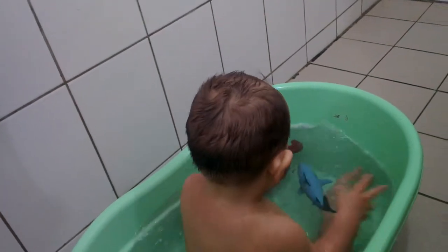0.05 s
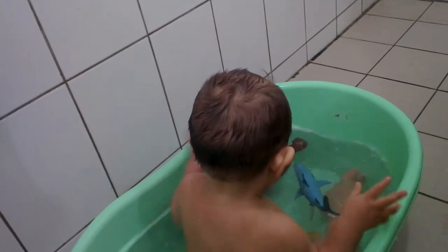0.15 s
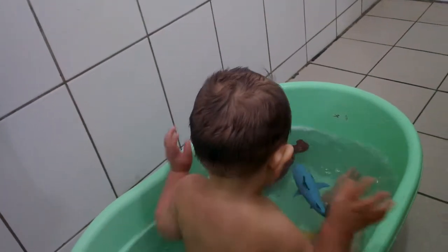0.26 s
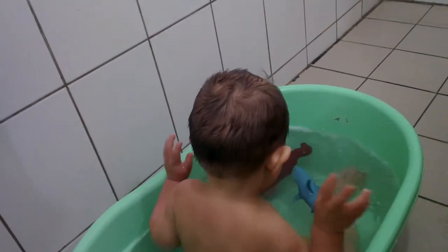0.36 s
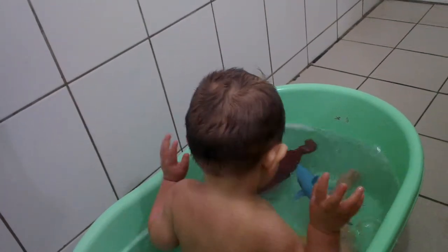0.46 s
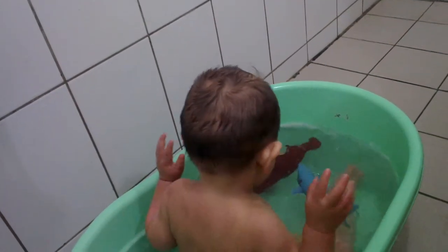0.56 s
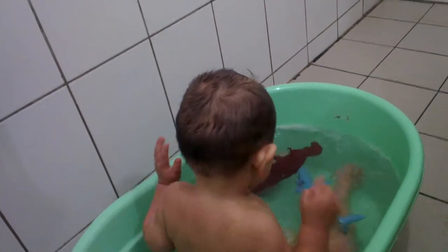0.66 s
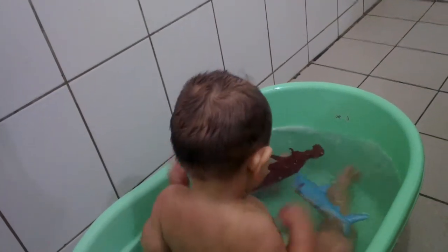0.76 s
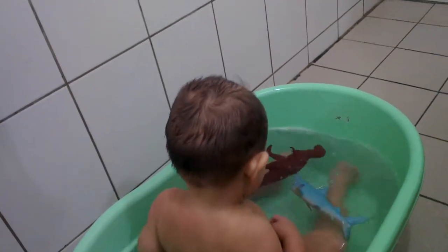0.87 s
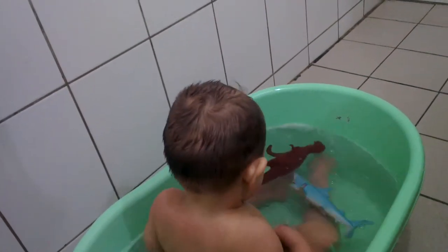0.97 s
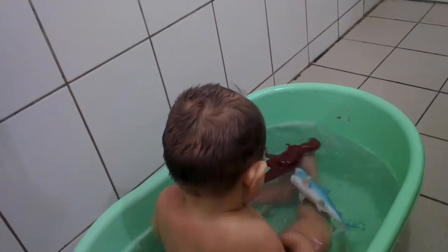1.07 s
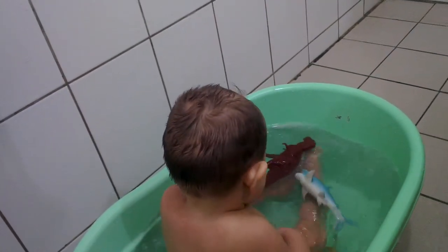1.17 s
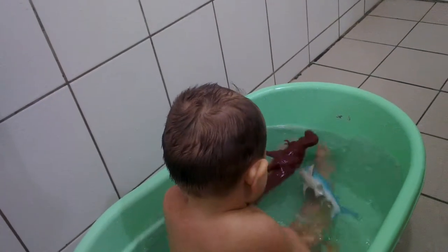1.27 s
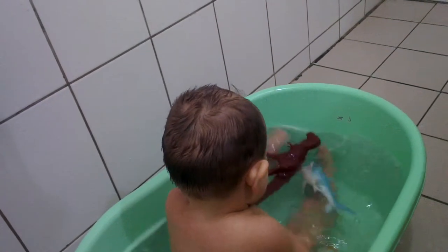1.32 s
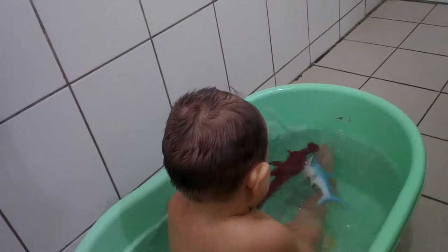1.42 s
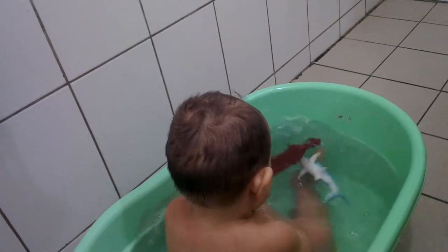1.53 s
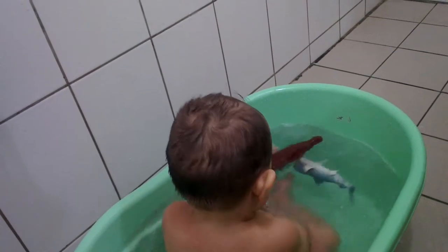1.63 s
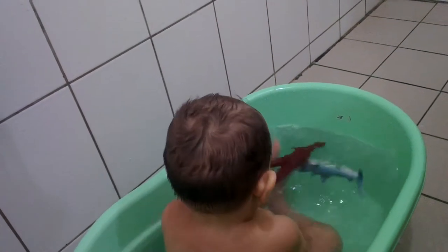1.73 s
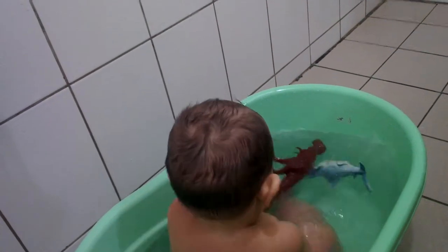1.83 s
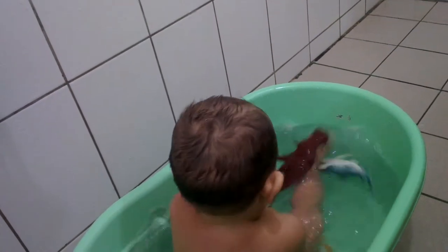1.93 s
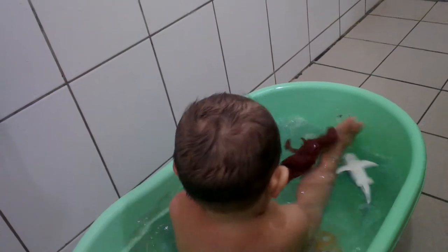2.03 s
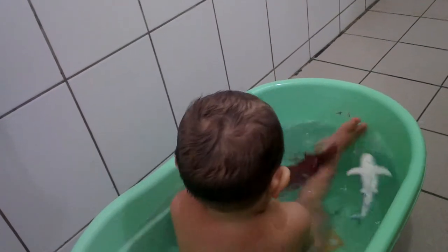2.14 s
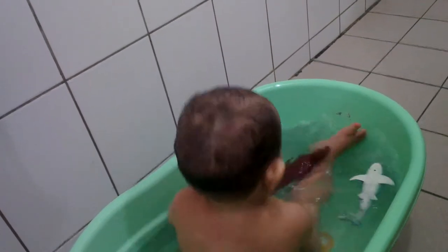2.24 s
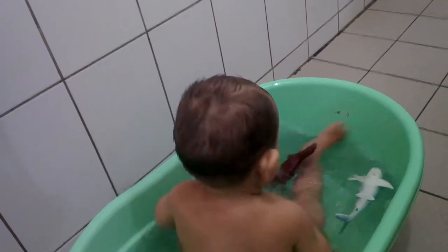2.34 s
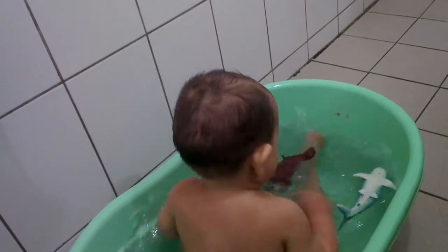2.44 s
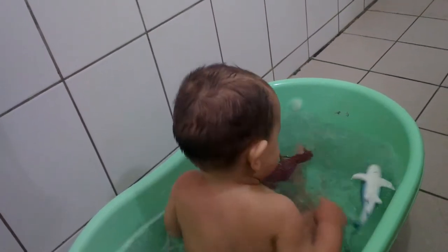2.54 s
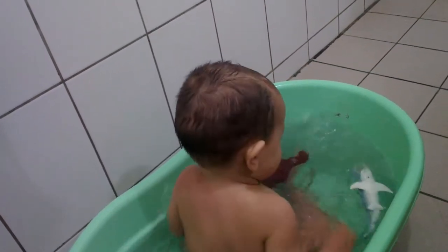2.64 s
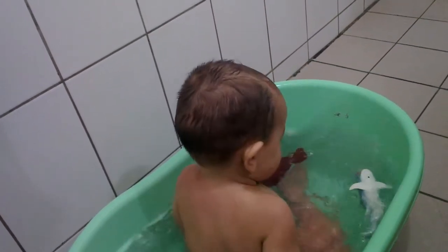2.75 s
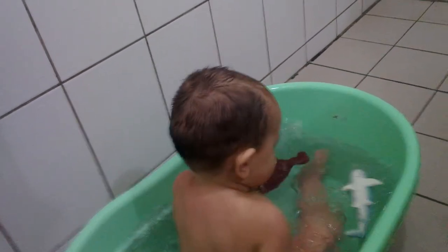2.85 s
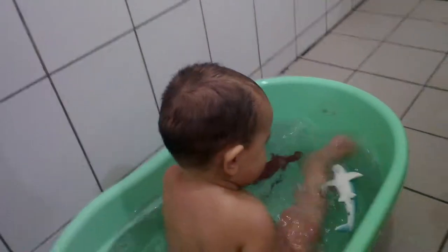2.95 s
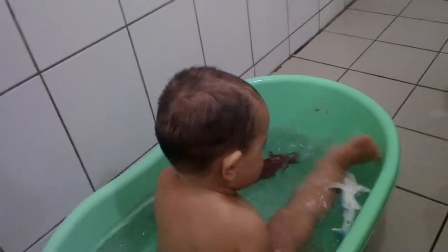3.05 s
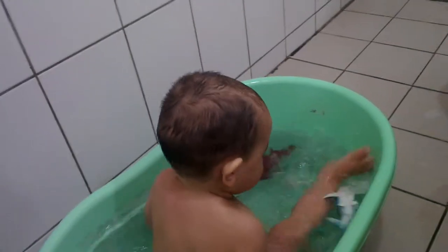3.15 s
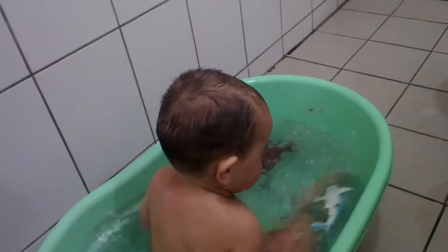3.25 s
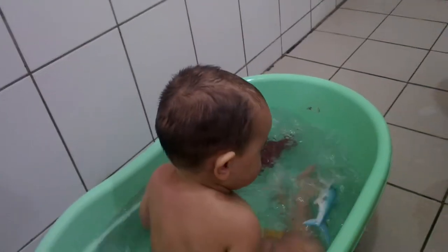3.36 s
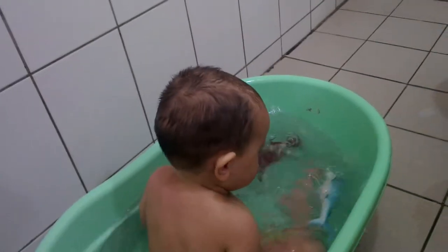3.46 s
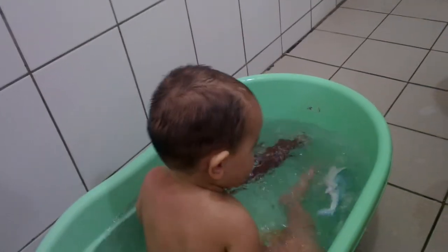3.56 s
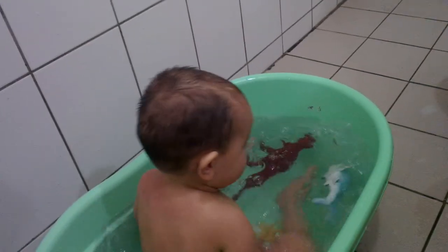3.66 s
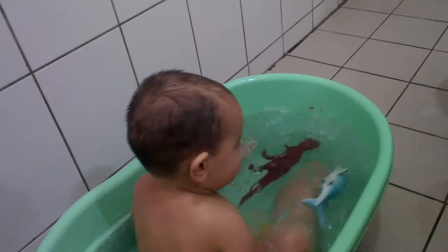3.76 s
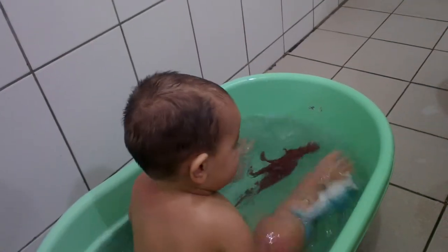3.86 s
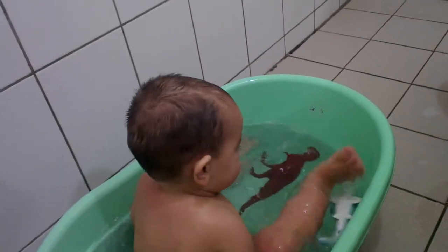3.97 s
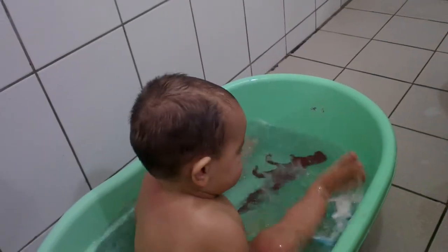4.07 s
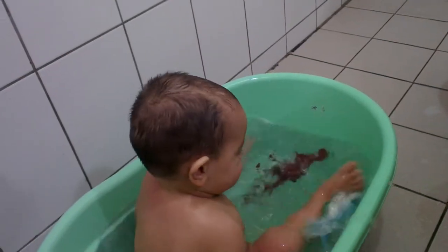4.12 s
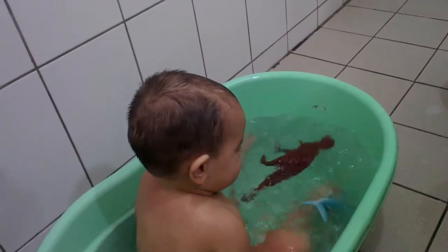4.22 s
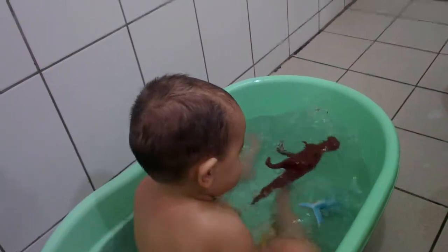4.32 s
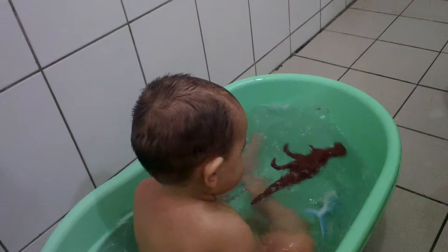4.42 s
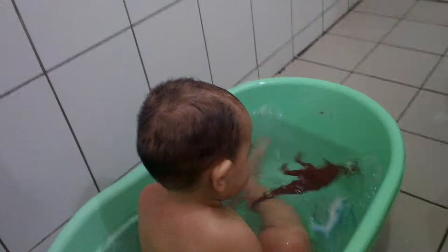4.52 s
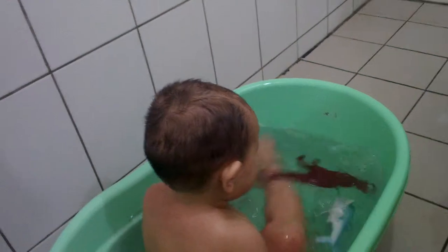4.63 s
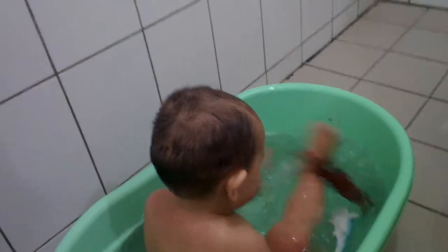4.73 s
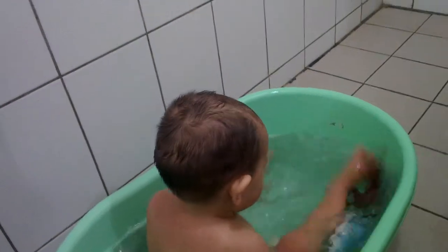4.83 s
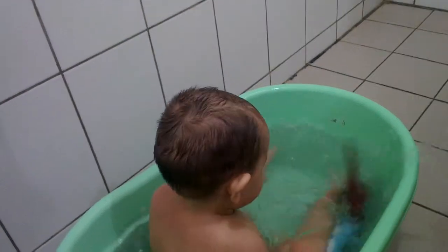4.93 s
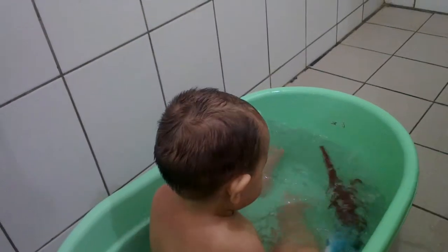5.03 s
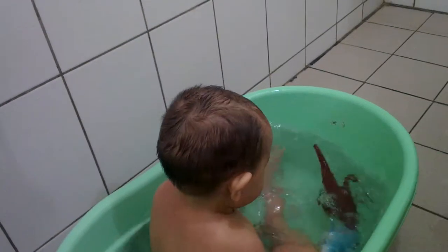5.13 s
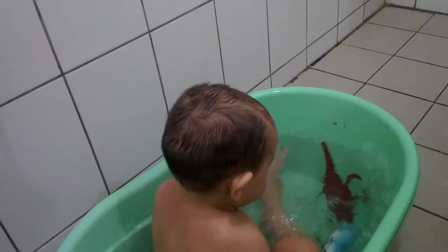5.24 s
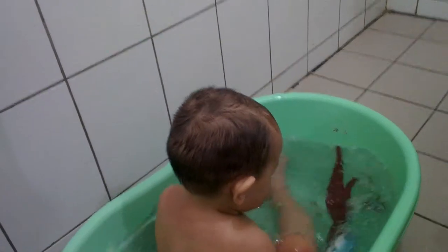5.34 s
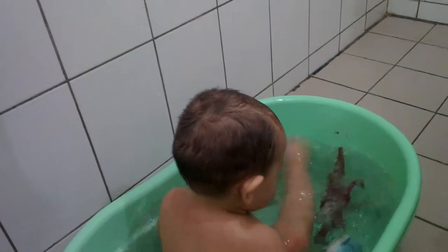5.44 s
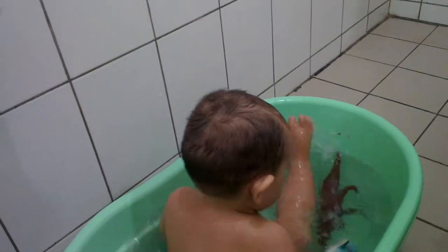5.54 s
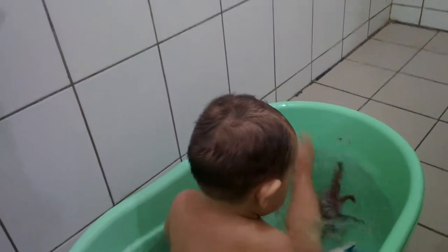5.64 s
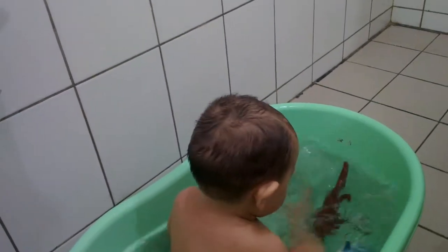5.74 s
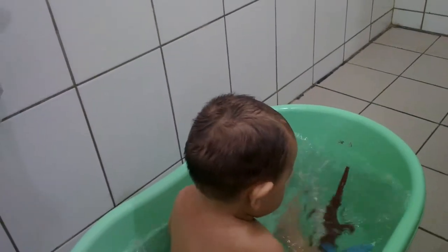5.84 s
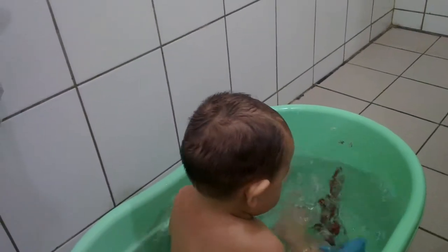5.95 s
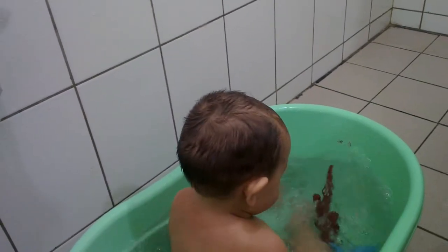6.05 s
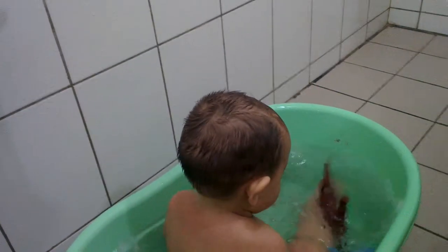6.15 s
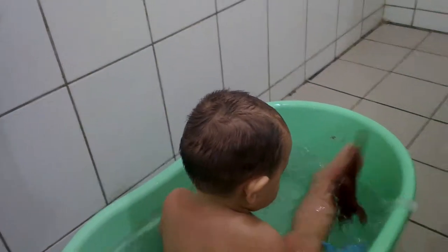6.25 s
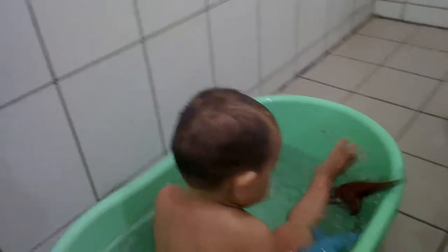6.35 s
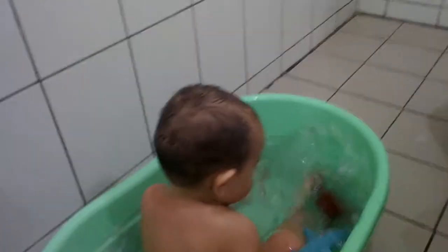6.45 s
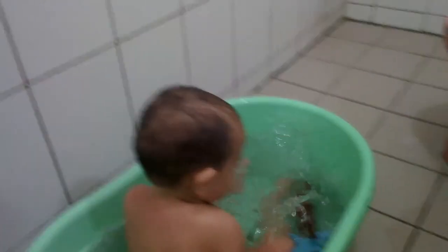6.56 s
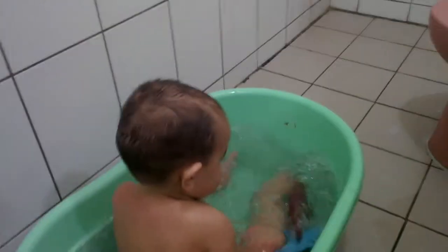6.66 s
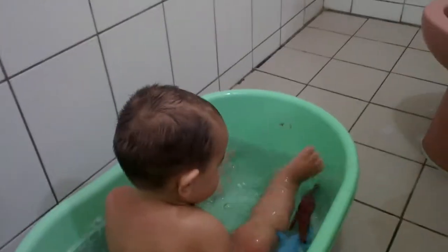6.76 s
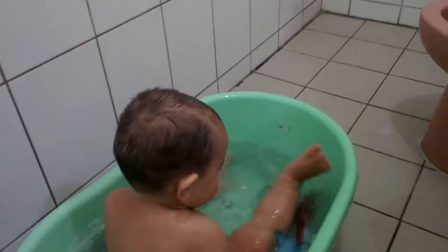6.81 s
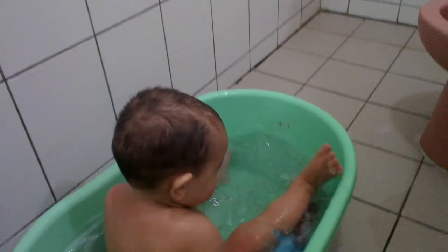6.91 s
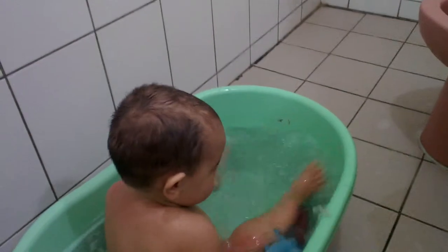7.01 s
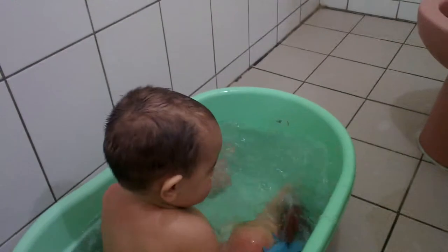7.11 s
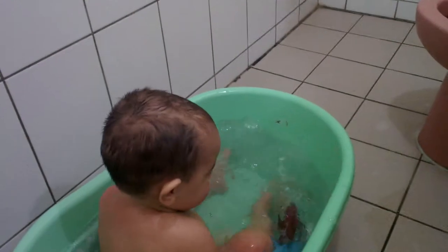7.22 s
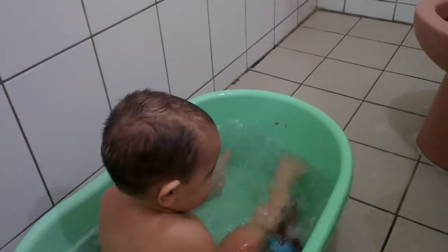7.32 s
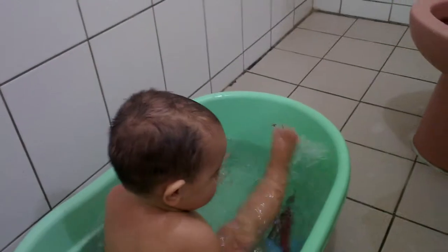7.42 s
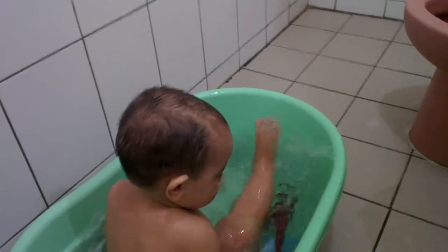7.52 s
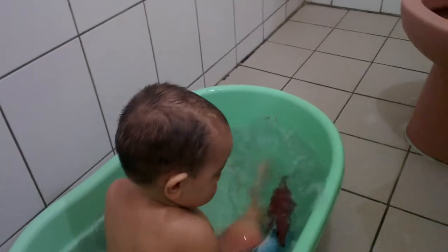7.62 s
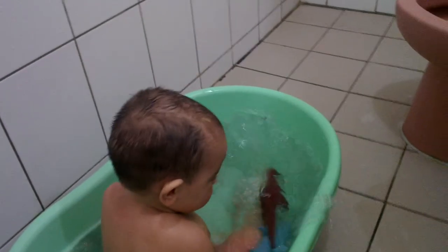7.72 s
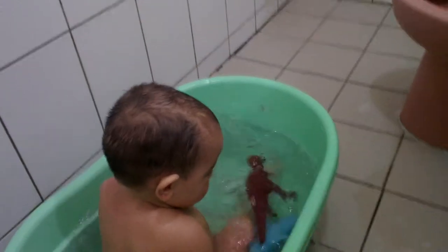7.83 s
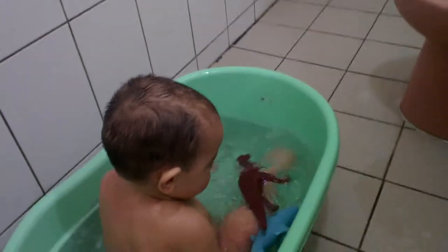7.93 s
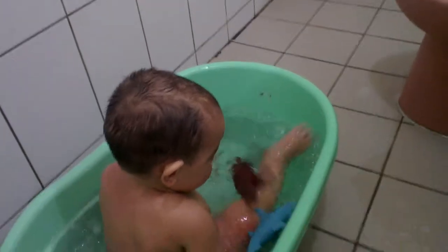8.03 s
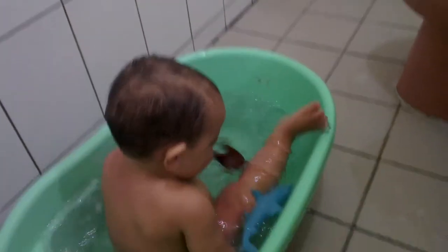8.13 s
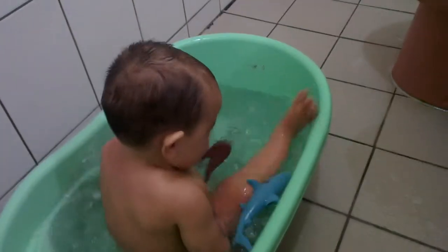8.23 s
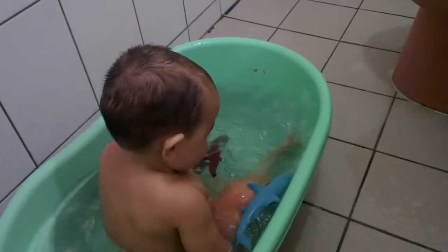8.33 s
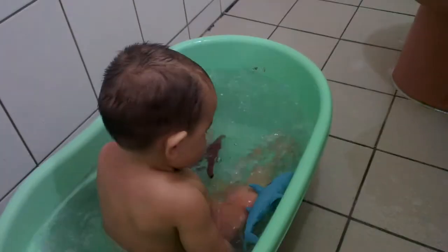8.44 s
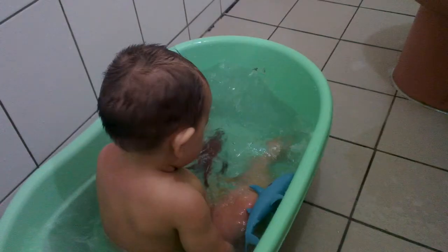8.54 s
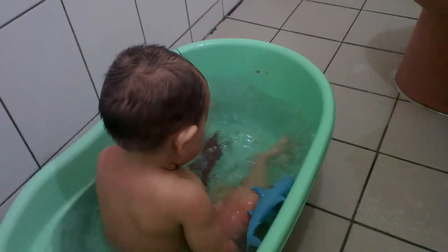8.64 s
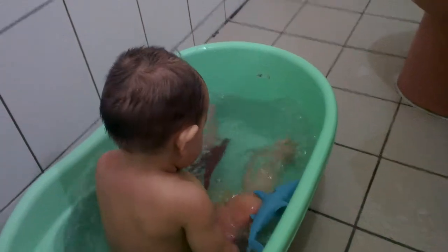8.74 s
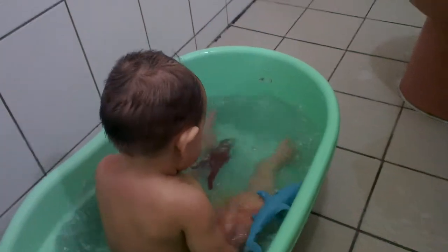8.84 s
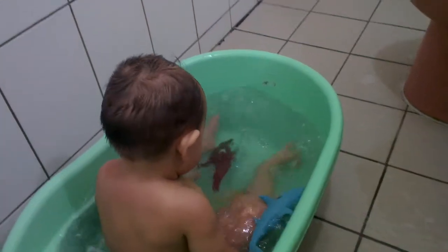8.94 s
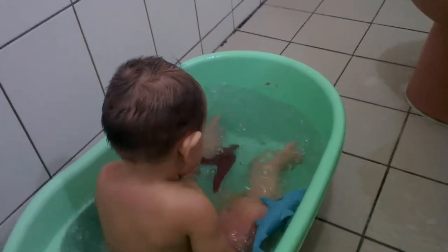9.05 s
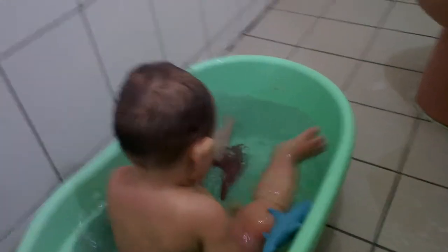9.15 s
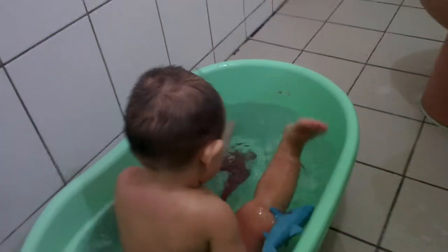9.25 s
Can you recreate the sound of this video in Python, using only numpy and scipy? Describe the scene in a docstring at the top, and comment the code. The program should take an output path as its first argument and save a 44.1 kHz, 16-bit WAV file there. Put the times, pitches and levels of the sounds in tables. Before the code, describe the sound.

Close to a plastic tub in a small tiled bathroom with a faint steady hiss. The first second is nearly quiet, with only tiny drips and a weak splash. From 1.4 to 2.6 seconds quick light splashes crackle, with high glassy bubble rings near 2.35. A lull follows until 3.0, then splashes build to a wet slap at 3.3. More plunges come around 4.0 to 4.3, then a heavy, deep splash at 4.9. A bright smack with spray lands at 5.8. The loudest moment is 6.4 to 6.6: hard slaps and big round plops, slightly overloaded. Further strong splashes hit at 7.05, 7.7 and 8.4, with swishing and bubbling between them. The water then calms to lapping and drips, with one small splash near 9.27. Every burst carries a short, dense tile echo.

```python
"""A tiled bathroom, where a small child kicks and swishes toys through the water of a plastic tub.
Each splash is a cloud of short ringing bubbles with spray, crackling densely over a softer fizz.
Single large bubbles plop as rising sine rings, and flat smacks crack as short bursts of noise.
The water sloshes on in between, the tiles answer with a short, dense echo,
and a faint steady hiss lies under it all."""
import sys
import numpy as np
from scipy import signal
from scipy.fft import rfft, irfft, next_fast_len
from scipy.io import wavfile
from scipy.ndimage import uniform_filter1d

SR = 44100
rng = np.random.default_rng(int(sys.argv[2]) if len(sys.argv) > 2 else 0)


def generate_wav(sig):
    """Save sig (samples, or channels by samples) to the path in sys.argv[1] as 16-bit PCM at SR."""
    pcm = np.round(np.clip(np.atleast_2d(sig).T, -1, 1) * 32767).astype(np.int16)
    wavfile.write(sys.argv[1], SR, pcm)


N = 409248

# still air of the room, relative spectrum: hz, density_db (per Hz)
AIR_SPECTRUM = [(35, -68), (60, -41.5), (135, -32), (295, -8.5), (798, -4), (1880, -9), (2840, -6),
                (5060, -23.5), (15000, -25.5)]
# water rocking in the tub: time_s, deep_gurgle_db, surface_lapping_db
SLOSH_LEVELS = [(0.0, -75.5, -69), (0.45, -85.5, -88.0), (0.92, -86.5, -78), (1.12, -66, -56.5),
                (1.28, -81.5, -76), (1.42, -53, -60.5), (2.7, -67, -58), (2.95, -66.5, -49),
                (3.55, -58.5, -57.5), (3.75, -69.5, -58), (4.35, -56.5, -51.5), (5.3, -58.0, -59.0),
                (6.05, -68.5, -52.5), (6.85, -60, -57), (7.33, -74, -61), (8.1, -59, -44),
                (8.72, -69.5, -55), (9.08, -77.5, -69.5)]
# single large bubbles: start_s, pitch_hz, relative_level_db
LARGE_BUBBLES = [(0.048, 1374, -41), (1.1, 986, -37.0), (1.115, 548, -39), (1.201, 2750, -36),
                 (1.33, 3360, -27.0), (1.403, 795, -19.5), (1.418, 625, -30.5), (1.531, 2790, -10),
                 (1.647, 1270, -18.5), (1.901, 2820, -28.5), (1.965, 2210, -24), (2.01, 1347, -18.5),
                 (2.083, 2440, -17), (2.33, 2744, -4), (2.342, 2694, -3.5), (2.353, 1279.0, -13),
                 (2.37, 1320, -9.5), (3.036, 1214.0, -25.0), (3.147, 1300, -18.0), (3.25, 1460, -14),
                 (3.565, 850.0, -28.5), (3.797, 1209, -35.5), (3.945, 2590, -17), (4.247, 1042, -12.5),
                 (4.283, 1028, -14.5), (4.463, 2800, -25), (4.828, 1276, -11.5), (5.421, 2680, -26),
                 (5.492, 1413, -17.0), (5.626, 1770, -25), (5.708, 2390, -13.5), (5.819, 344, -18.5),
                 (6.058, 1556, -33.5), (6.304, 2900, -18.0), (6.392, 1276, -0.5), (6.394, 749, -5),
                 (6.546, 1394, 6.5), (6.821, 3780, -18.5), (6.922, 3730, -16.5), (7.441, 1544.0, -12),
                 (7.59, 1072, -12), (7.656, 1036, -11), (7.972, 3040, -20.5), (8.05, 964, -28.0),
                 (8.08, 1315, -26), (8.12, 1270, -22.5), (8.194, 1014, -7.5), (8.225, 756, -16.5),
                 (8.283, 932, -13.5), (8.433, 1494.0, -1), (9.257, 1460, -20)]
# splashes; depth is big bubbles over droplets, spray is fine spray over droplets:
# start_s, t60_s, level_db, depth_db, spray_db
SPLASH_EVENTS = [(0.188, 0.25, -50.5, -2.0, 9.0), (0.945, 0.43, -42, -9.5, -1.5),
                 (1.098, 0.48, -49.5, 4, -0.5), (1.393, 0.18, -33, 6, -15.5),
                 (1.532, 0.1653, -16.5, -11.5, -10), (1.555, 0.09, -17.5, -12.5, -7.5),
                 (1.691, 0.07, -20.5, -5, -4), (1.712, 0.0751, -21, -15.5, -2), (1.948, 0.64, -35, -8.5, 0),
                 (2.01, 0.12, -29, -0.0, -12.5), (2.174, 0.09, -20, -17.5, 2.5),
                 (2.352, 0.07, -17, -6.5, -9), (2.412, 0.5, -31, -1.5, 2.5), (2.475, 1, -37.0, 1.5, 5),
                 (2.566, 0.16, -23.5, -7.5, 2.5), (2.608, 0.0541, -22.5, -11.5, 5),
                 (3.03, 0.44, -31.5, -1.0, -5.5), (3.146, 0.52, -22, -8, -4.5),
                 (3.197, 0.17, -17.5, -14.5, -1.5), (3.265, 0.2, -30.0, 1.0, -6.0),
                 (3.329, 0.2272, -10.5, -3.5, -5), (3.908, 0.15, -40, -9.5, 4), (4.031, 0.42, -24, 0, -2.5),
                 (4.084, 0.13, -18.5, -0.5, -0.5), (4.246, 0.23, -19.5, -3, -1), (4.29, 0.07, -11.0, -2, 1),
                 (4.49, 0.1, -31, -19.0, -1), (4.79, 0.77, -25.5, -9, -2.5), (4.828, 0.33, -20.0, 2.0, -5),
                 (4.867, 0.12, -10.5, -9, -0.5), (4.935, 0.1427, -10.5, 4.5, -18.0),
                 (4.989, 0.19, -14.0, -1.5, -0.5), (5.151, 0.1365, -20, -6, 2.5),
                 (5.206, 0.08, -22.0, -24, 6), (5.492, 0.44, -34, -6, -9.5), (5.705, 0.48, -23.5, -14, -5),
                 (5.785, 0.1059, -21, 0.5, 6.5), (5.807, 0.1522, -12, -5.5, 5), (6.193, 0.28, -36, -20, -9),
                 (6.388, 0.34, -11.5, 2.5, -5.5), (6.483, 0.3, -13, 1, 1.0), (6.547, 0.05, -10, 3, -4.5),
                 (6.67, 0.4, -27.5, 4.5, -5), (6.922, 0.6, -31.5, -21.0, 4.5),
                 (7.012, 0.47, -17.5, 1, -8.5), (7.054, 0.1861, -9, 1.5, -9.5),
                 (7.169, 0.0745, -19.5, -15.5, 8), (7.389, 0.24, -38, 1.5, -12.5),
                 (7.425, 0.45, -21.5, -7, -11), (7.59, 0.13, -23, 3, -8), (7.633, 0.13, -15, -3.5, -1.5),
                 (7.74, 0.1144, -11.5, -0.5, 0), (7.973, 0.11, -19, -24.5, 9.5),
                 (8.175, 0.17, -28.5, -2, -7.5), (8.223, 0.37, -27, -1.5, -7),
                 (8.278, 0.52, -27.0, -4, 2.0), (8.374, 0.18, -12.5, -3.5, -8),
                 (8.409, 0.25, -14.5, -1.0, -1), (8.434, 0.206, -13.5, -2.5, -1.5),
                 (9.267, 0.25, -28.5, -4.5, -14.5)]
# a limb or toy swishing through the water: fastest_s, half_length_s (peak to half amplitude), level_db
SWISH_EVENTS = [(1.56, 0.14, -39.5), (2.12, 0.237, -40.5), (2.427, 0.084, -28.5), (2.772, 0.05, -45.5),
                (3.311, 0.14, -29.5), (3.56, 0.079, -41.5), (4.123, 0.15, -29.0), (4.745, 0.074, -35.0),
                (4.908, 0.024, -15.5), (5.583, 0.14, -43.5), (6.384, 0.11, -34.5), (6.673, 0.018, -33),
                (7.02, 0.16, -36), (7.69, 0.098, -24), (7.942, 0.038, -38.5), (8.283, 0.028, -26),
                (9.248, 0.057, -49)]
# a hand or foot smacking flat on the water: start_s, level_db, lower_edge_hz, upper_edge_hz
SMACK_EVENTS = [(3.331, -15.5, 803, 5000), (4.935, -11.5, 280, 3500), (5.808, -6, 300, 8070),
                (6.389, -5, 349, 3290), (6.546, -12.5, 400, 2505), (7.054, -7, 550, 4490),
                (7.74, -14.5, 350, 9000), (7.97, -24.5, 2590, 11910), (8.377, -19, 900, 7970),
                (8.435, -12.5, 400, 4000)]
# thumps, gulps, bubbles, droplets, spray, one row each:
# lowest_hz, highest_hz, base_rate_per_s, base_decay_cycles, size_spread_db, level_db
BUBBLE_CLASSES = [(235.7, 427, 350, 3.0, 1, -2.3), (414.4, 690, 500, 4.1, 6, -2.3),
                  (698, 1997, 950, 7, 4, -1.4), (1966, 4994, 1500, 6.4, 5.5, 0.34),
                  (4860, 15500, 3800, 5.5, 3, -0.4)]
# what stirs each of those classes: splash_db, by_depth (dB per dB), by_spray (dB per dB),
# swish_db, slosh_db, smack_db, wake_db
STIRRING_LEVELS = [(-22, 2, 0.5, -33.5, -6.5, -20, -47.5), (-13, 2.5, 0, -20, 2, -14.5, -38),
                   (0.5, 1, 0, -5.5, 0, -21, -37.5), (0, 0, 0, 0, 1, -29, -51.5),
                   (0.5, 0, 1, -4.5, -0.8, -30.5, -56)]
# colour of the churning water, relative spectrum: hz, density_db (per Hz)
WATER_COLOUR = [(30, -32.5), (175, -30.5), (240, -14.5), (330, -6), (500, -3.5), (640, -1), (790, 1),
                (1000, -0.5), (1350, 3), (1950, -4.5), (2800, 0.5), (3700, -2.6), (5200, -7), (7500, -5.5),
                (9800, -11), (12000, -24.5), (15500, -33.5)]
# ring of the tiled room: hz, t60_s
TILE_RING = [(220, 0.58), (500, 0.36), (1400, 0.3), (3700, 0.27), (9700, 0.28), (15000, 0.26)]
# stereo lean: hz, left_over_right_db
STEREO_LEAN = [(60, -2), (110, -2.5), (200, 2), (380, -1), (700, -1.5), (1290, -1.5), (2380, -2.5),
               (4400, -4), (8120, -2.5), (15000, 7.5)]

AIR_DB = -75
SMACK_T60_S, WAKE_T60_S = 0.16, 1.7  # a smack churns the water briefly; its waves lap on
DEEP_HZ, SHALLOW_DB_PER_OCTAVE = 300, -7.5  # a higher, shallower smack moves less water
SWELL_S, SPRAY_SWELL_S, WAKE_SWELL_S = 0.0023, 0.007, 0.072  # spray flies up a little after the bubbles
EDGE_HZ = 15650  # top of the treble


def gain_of(db):
    """Decibels to amplitude."""
    return 10 ** (np.asarray(db) / 20)


def evened(x):
    """Scales a sound to rms 1."""
    return x / np.sqrt(np.mean(x ** 2) + 1e-20)


def read(points, hz):
    """Reads a table joined by straight lines on a log-frequency axis."""
    table_hz, value = np.transpose(points)
    return np.interp(np.log(hz + 1), np.log(table_hz + 1), value)


def coloured(x, gain):
    """Filters a sound by a gain that is a function of frequency."""
    size = next_fast_len(N + 4096)
    spectrum = rfft(x, size) * gain(np.fft.rfftfreq(size, 1 / SR))
    return irfft(spectrum, size)[..., :N]


def add(mix, start_s, sound):
    """Mixes a sound in, starting no earlier than the first sample."""
    part = mix[max(round(start_s * SR), 0):][:len(sound)]
    part += sound[:len(part)]


def still_air():
    """The quiet room: steady hiss, independent on each side, shaped by the air's spectrum."""
    noise = rng.standard_normal((2, N))
    shaped = coloured(noise, lambda hz: gain_of(read(AIR_SPECTRUM, hz)))
    return gain_of(AIR_DB) * evened(shaped)


def slosh_power(kind, slosh_db):
    """Rocking water stirs thumps and gulps by its deep gurgle, smaller bubbles by its surface lapping."""
    times_s, deep_db, surface_db = np.transpose(SLOSH_LEVELS)
    level_db = np.interp(np.arange(N) / SR, times_s, deep_db if kind < 2 else surface_db)
    return gain_of(level_db + slosh_db) ** 2


def burst(t60_s, swell_s):
    """Stirring power that swells quickly, then dies away by 60 dB."""
    age_s = np.arange(int(t60_s * SR)) / SR
    return np.exp(-np.log(1e6) * age_s / t60_s) * (1 - np.exp(-age_s / swell_s))


def add_splashes(power, kind, splash_db, by_depth, by_spray):
    """Each splash stirs bubbles in a burst, balanced by its depth and its spray."""
    swell_s = SPRAY_SWELL_S if kind == len(BUBBLE_CLASSES) - 1 else SWELL_S
    for start_s, t60_s, level_db, depth_db, spray_db in SPLASH_EVENTS:
        stir_db = level_db + splash_db + by_depth * depth_db + by_spray * spray_db
        add(power, start_s, gain_of(stir_db) ** 2 * burst(t60_s, swell_s))


def add_swishes(power, swish_db):
    """A limb or toy speeds up and slows down, so its stirring rises and falls smoothly."""
    for fastest_s, half_s, level_db in SWISH_EVENTS:
        stroke = np.hanning(2 * int(2 * half_s * SR)) ** 2
        add(power, fastest_s - 2 * half_s, gain_of(level_db + swish_db) ** 2 * stroke)


def add_smack_wakes(power, smack_db, wake_db):
    """A flat smack churns the water at once and leaves a slower, longer wake."""
    churn = gain_of(smack_db) ** 2 * burst(SMACK_T60_S, SWELL_S)
    wake = gain_of(wake_db) ** 2 * burst(WAKE_T60_S, WAKE_SWELL_S)
    for start_s, level_db, low_hz, _ in SMACK_EVENTS:
        moved = gain_of(level_db + SHALLOW_DB_PER_OCTAVE * np.log2(low_hz / DEEP_HZ)) ** 2
        add(power, start_s, moved * churn)
        add(power, start_s, moved * wake)


def agitation(kind):
    """Sums the power of all that stirs one size of bubble, and returns it as amplitude."""
    splash_db, by_depth, by_spray, swish_db, slosh_db, smack_db, wake_db = STIRRING_LEVELS[kind]
    power = slosh_power(kind, slosh_db)
    add_splashes(power, kind, splash_db, by_depth, by_spray)
    add_swishes(power, swish_db)
    add_smack_wakes(power, smack_db, wake_db)
    return np.sqrt(power)


def bubble(hz, cycles, rise):
    """A pocket of air rings down; its pitch climbs as it nears the surface."""
    life_s = cycles / hz  # time to fall to 1/e
    t = np.arange(int(6 * life_s * SR) + 2) / SR
    phase = 2 * np.pi * hz * t * (1 + rise * t / life_s / 2)
    return np.exp(-t / life_s) * np.sin(phase)


def bubble_births(stir, per_s, spread_db, steadiness=0.46, crowd_s=0.024, boil_db=-24, thinning=0.48):
    """Random impulses that crowd together in churned water and thin to separate drips in calm water."""
    density = np.clip(stir / gain_of(boil_db), 0.03, 2) ** thinning
    chance = rng.random(N)
    size = np.minimum(rng.exponential(1, N), 5)
    births = (chance < density * per_s / SR) * rng.choice([-1., 1.], N)
    born = np.flatnonzero(births)
    births[born] *= gain_of(spread_db * size[born]) / np.sqrt(density[born])
    # even out the level where impulses crowd together
    crowd = abs(uniform_filter1d(births ** 2, int(crowd_s * SR)))
    births[born] /= crowd[born] ** (steadiness / 2)
    return born, evened(births) * stir


def cloud(kind, count=48, rise=0.032, fizz=0.27):
    """Bubbles of one size class: ringing grains over a smooth fizz, in the water's colour."""
    low_hz, high_hz, per_s, cycles, spread_db, level_db = BUBBLE_CLASSES[kind]
    stir = agitation(kind)
    born, births = bubble_births(stir, per_s, spread_db)

    # a stock of rings, spread evenly in log pitch with some scatter
    steps = (np.arange(count) + rng.random(count)) / count
    pitches = low_hz * (high_hz / low_hz) ** steps
    which = rng.integers(0, count, N)
    decay_cycles = cycles * rng.uniform(0.44, 1.6, count)
    rings = []
    for hz, ring_cycles in zip(pitches, decay_cycles):
        ring = bubble(hz, ring_cycles, rise)
        rings.append(ring / np.linalg.norm(ring) * np.sqrt(hz / pitches.mean()))

    out = fizz * stir * rng.standard_normal(N) * np.sqrt(SR / 2 / (high_hz - low_hz))
    for i in born:
        ring = rings[which[i]][:N - i]
        out[i:i + len(ring)] += births[i] * ring

    def colour(hz, order=10):
        """The water's colour within this class; the lowest class has no lower cutoff."""
        below = (low_hz / (hz + 1)) ** order if kind else 0
        return gain_of(read(WATER_COLOUR, hz)) / np.sqrt(1 + below + (hz / high_hz) ** order)

    band_rms = np.sqrt(np.mean(colour(np.linspace(low_hz, high_hz)) ** 2))
    return gain_of(level_db) * coloured(out, colour) / band_rms


def plops(cycles=10, rise=0.017, level_db=0.57, swell_cycles=1.0, cut_hz=330, order=4):
    """Large single bubbles swell over about a cycle as they pinch off, and ring; deep bass is cut."""
    out = np.zeros(N)
    for start_s, hz, db in LARGE_BUBBLES:
        ring = bubble(hz, cycles, rise)
        swell = 1 - np.exp(-np.arange(len(ring)) * hz / SR / swell_cycles)
        add(out, start_s, gain_of(db + level_db) * ring * swell)
    return coloured(out, lambda hz: 1 / np.sqrt(1 + (cut_hz / (hz + 1)) ** (2 * order)))


def smacks(life_s=0.0037, push_db=-35, order=3):
    """The cavity under a flat blow collapses in a short, dense crack with a little deep push."""
    out = np.zeros(N)
    t = np.arange(SR // 16) / SR
    for start_s, level_db, low_hz, high_hz in SMACK_EVENTS:
        noise = rng.standard_normal(len(t))
        push = signal.lfilter(*signal.butter(order, high_hz, fs=SR), noise)
        crack = signal.lfilter(*signal.butter(order, low_hz, "high", fs=SR), push)
        blow = evened(crack + gain_of(push_db) * push)
        add(out, start_s, gain_of(level_db) * blow * np.exp(-t / life_s))
    return out


def bathroom(x, early=0.46, wet=0.69, shared_hz=620, gap_s=0.005, count=12):
    """First echoes off tub and wall, then a dense tail that both sides share in the bass."""
    hz, t, z = signal.stft(rng.standard_normal((2, SR)), SR, nperseg=512)
    same = (1 / (1 + (hz / shared_hz) ** 2))[:, None]
    z[1] = same * z[0] + np.sqrt(1 - same ** 2) * z[1]
    t60_s = read(TILE_RING, hz)[:, None]
    decaying = z * gain_of(-60 * t / t60_s) / np.sqrt(t60_s)
    tail = signal.istft(decaying, SR, nperseg=512)[1][:, :SR]
    tail *= np.clip(np.arange(SR) / SR / gap_s - 1, 0, 1)  # silent for the gap, then fades in
    response = wet * tail / np.linalg.norm(tail[0])
    for side in response:
        delays = (rng.uniform(0.001, 0.017, count) * SR).astype(int)
        side[delays] += early * rng.choice([-1, 1], count) / np.sqrt(count)
    return signal.fftconvolve(x[None].astype(np.float32), response.astype(np.float32), axes=1)[:, :N]


def around_the_tub(water, count=4, wander_hz=17, direct=0.55):
    """Bubbles burst all over the tub: sound circles quickly between spots, each with its own echoes."""
    place = wander_hz * np.arange(N) / SR * count
    heard = direct * water
    for k in range(count):
        nearness = np.maximum(1 - abs((place + k) % count - count / 2), 0)
        heard = heard + bathroom(water * np.sin(np.pi / 2 * nearness))
    return heard


def scene():
    """Mixes the water, sets it in the room with its left-right lean, and adds still air."""
    water = sum(cloud(kind) for kind in range(len(BUBBLE_CLASSES))) + plops() + smacks()
    heard = around_the_tub(water)
    # half the lean goes to each side, in opposite directions
    leaning = coloured(heard, lambda hz: gain_of(np.outer([0.5, -0.5], read(STEREO_LEAN, hz))))
    return leaning + still_air()


def record(dry, order=6):
    """The hardest slaps overload the input and are rounded off; then the top treble is cut."""
    clipped = dry / (1 + abs(dry) ** order) ** (1 / order)
    lowpass = signal.firwin(511, EDGE_HZ, window=("kaiser", 9), fs=SR)
    return signal.oaconvolve(clipped, lowpass[None], "same")


dry = scene()
out = record(dry)
generate_wav(out)
```